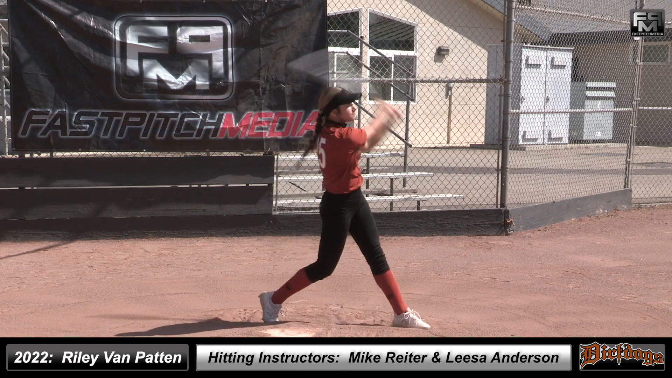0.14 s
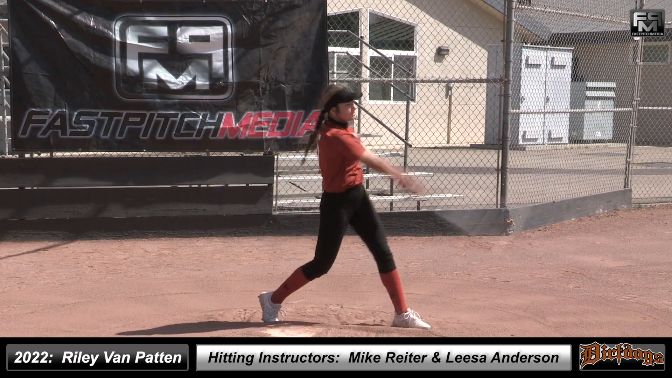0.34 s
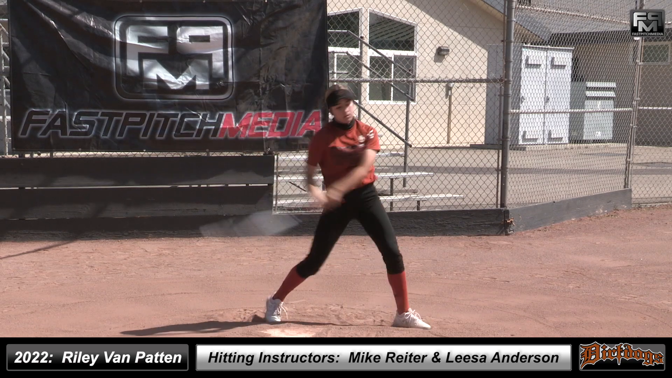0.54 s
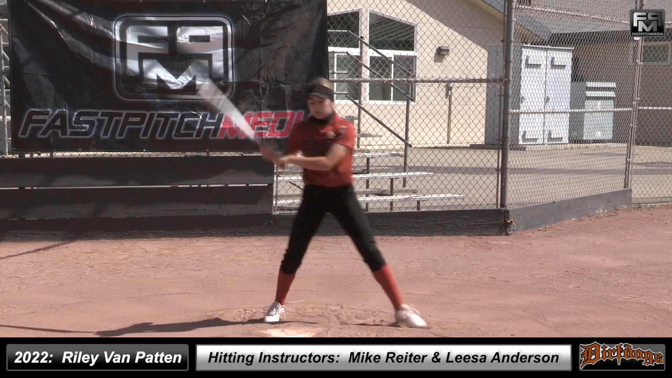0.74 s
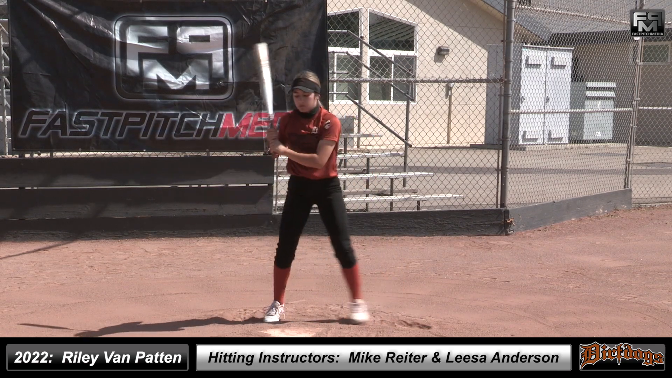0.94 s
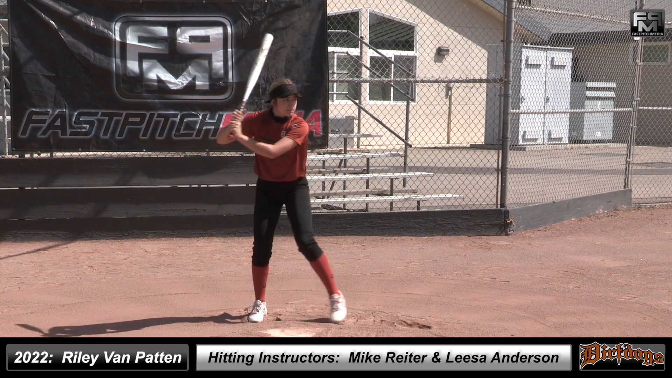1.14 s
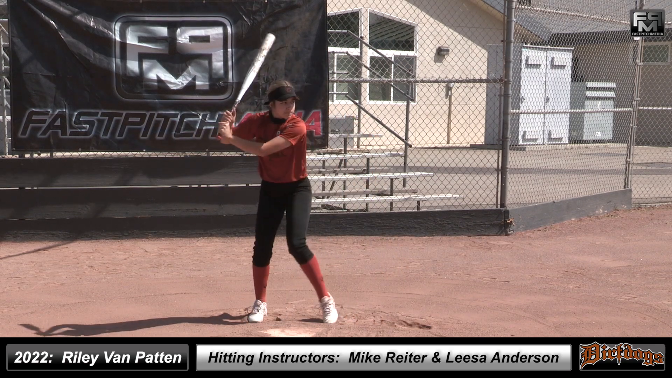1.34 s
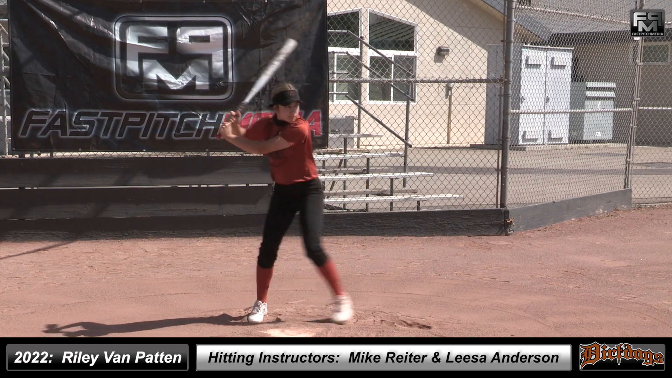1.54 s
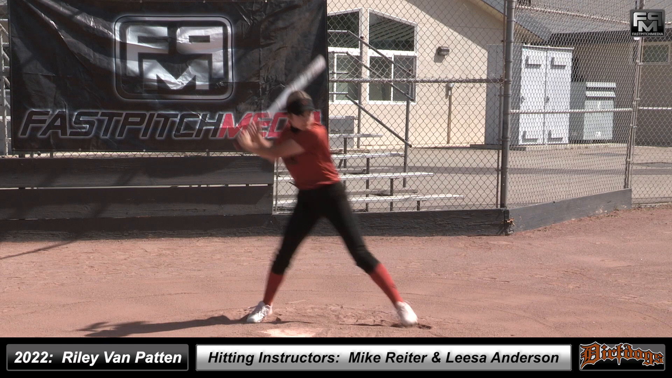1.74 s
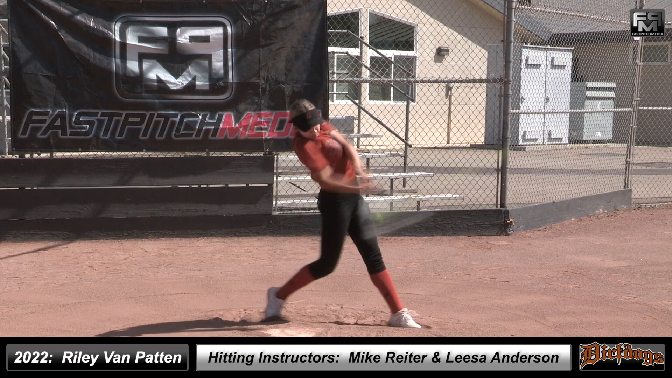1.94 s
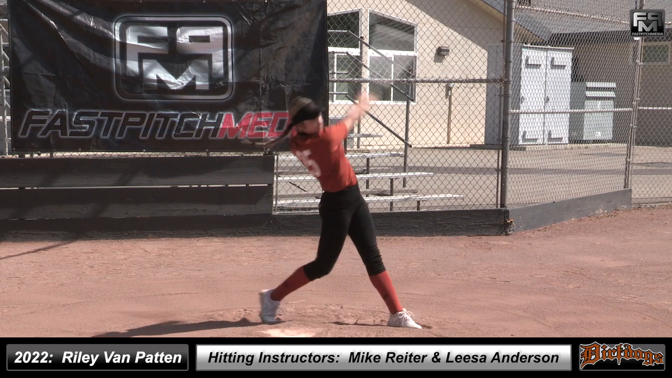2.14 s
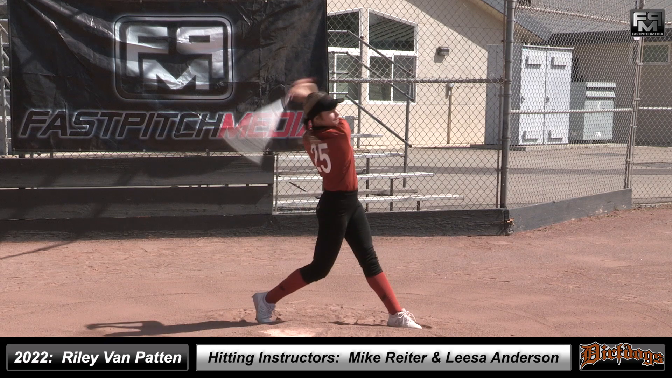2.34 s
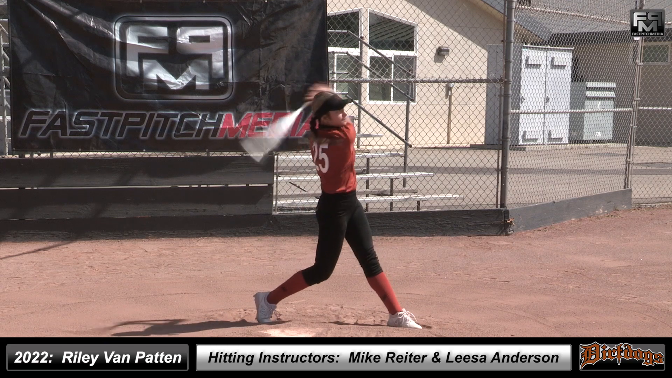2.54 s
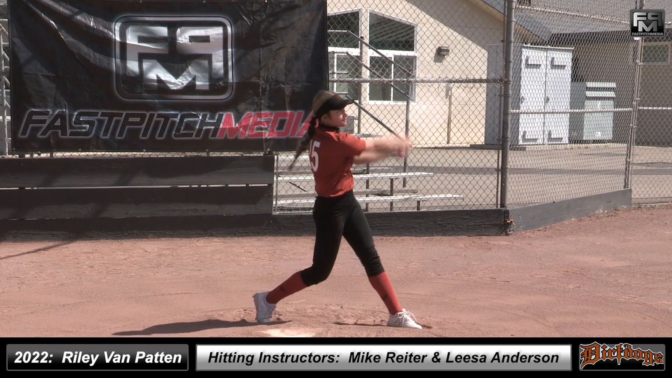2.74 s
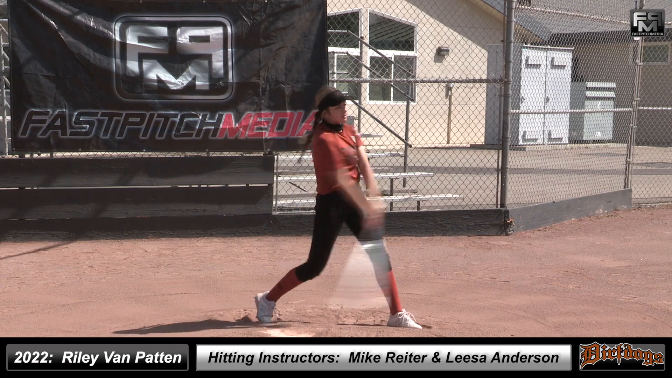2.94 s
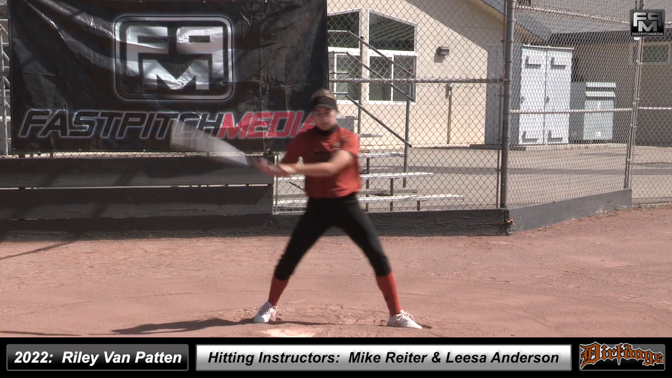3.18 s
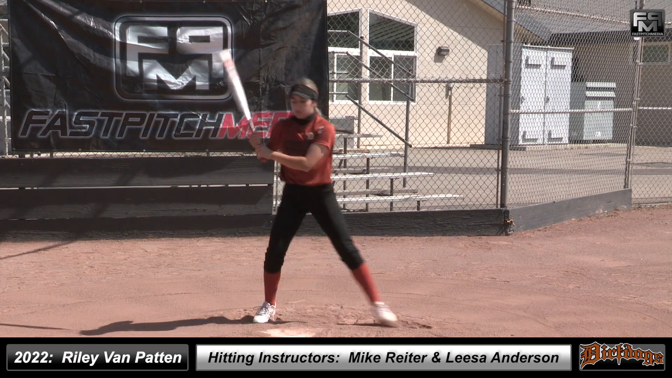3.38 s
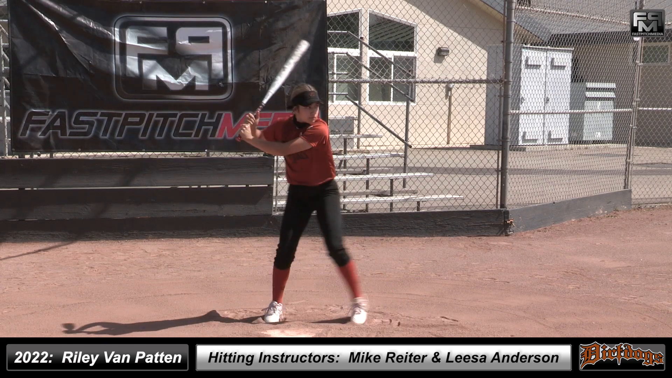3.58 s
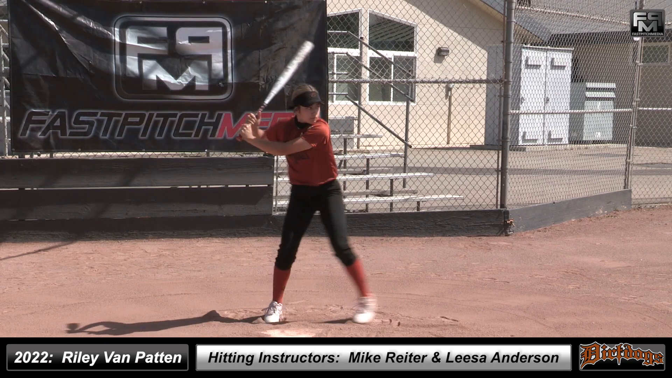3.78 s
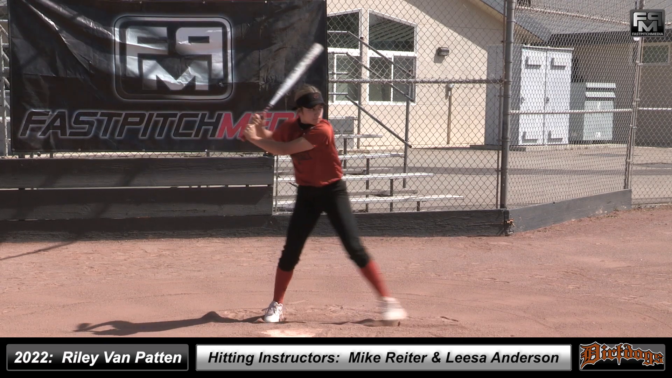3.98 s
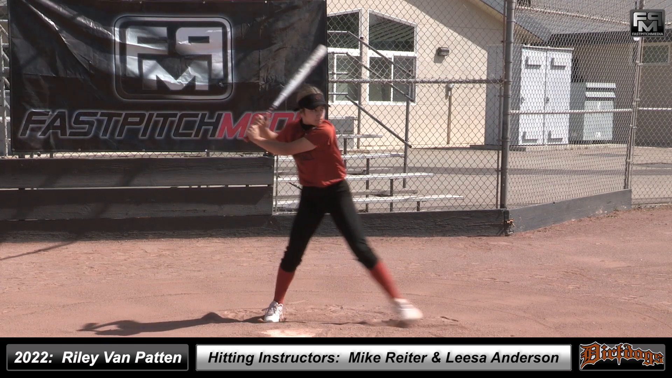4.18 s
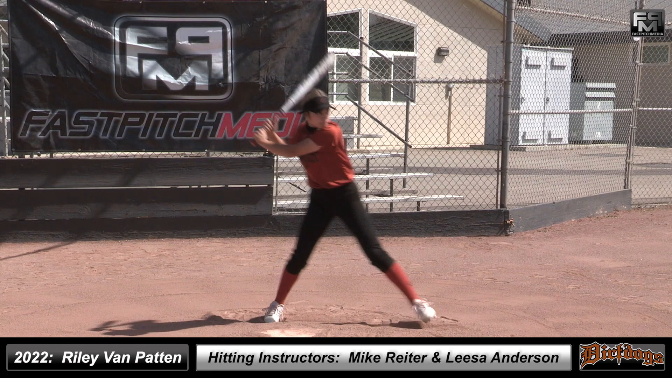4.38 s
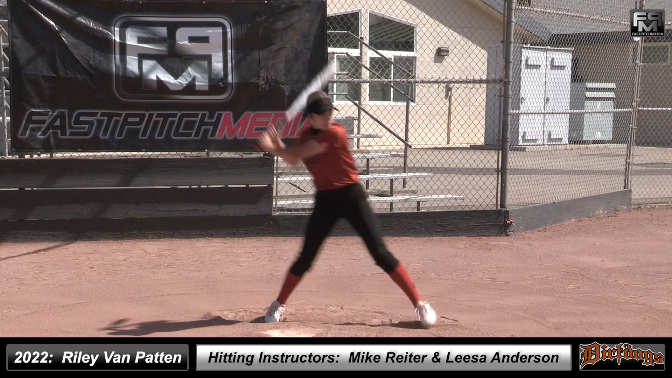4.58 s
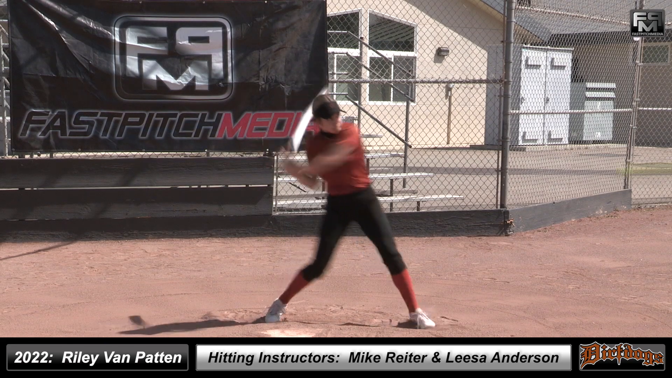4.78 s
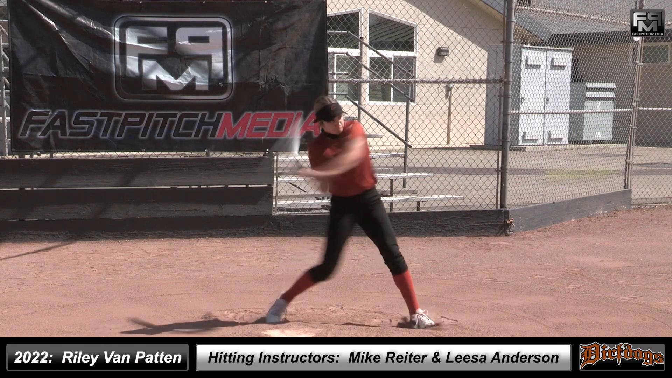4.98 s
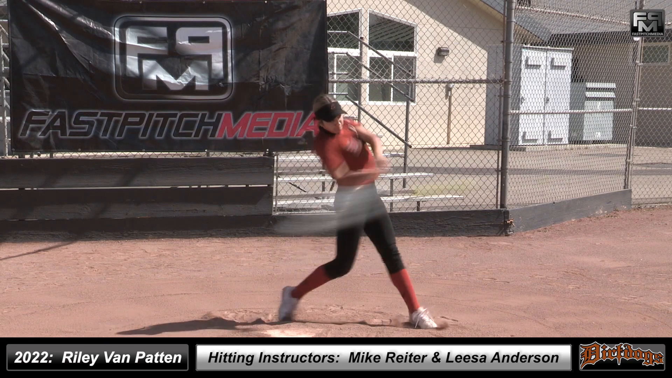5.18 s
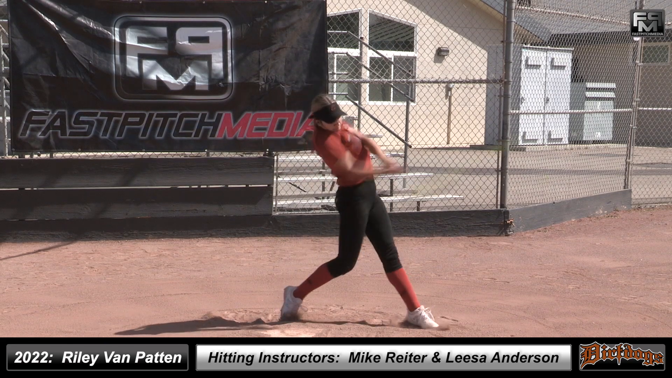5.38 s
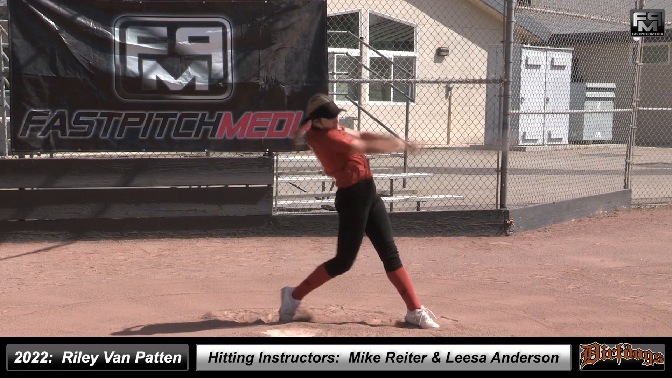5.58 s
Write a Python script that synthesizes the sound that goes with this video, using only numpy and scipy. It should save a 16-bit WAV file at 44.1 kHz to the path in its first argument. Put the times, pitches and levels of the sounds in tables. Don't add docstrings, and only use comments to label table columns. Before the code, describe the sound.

The tail of an earlier hit is dying away at the start, over a low motor hum, rumbling distant traffic and light hiss. Faint ticks and a shoe scuff come before 1 s. At 1.0 s a pitching machine gives a short hollow clack, with a clear slap echo about 0.2 s later. A stride scrapes dirt near 1.9 s, then at 2.0 s the bat cracks violently, clipping the microphone; fences and walls return a burst of clattering echoes and a grainy tail over a second long. A ball smacks at 2.5 s with a low thud, with a weaker thud near 3.1 s. At 3.58 s a momentary silence marks a cut to a duller, closer background. Soft scuffs follow, a brighter close clack at 4.48 s, a tick at 5.2 s and a dull step at 5.3 s. At 5.44 s a full, punchy crack hits and the background abruptly ducks, leaving faint echoes and small ticks.

```python
import sys
import numpy as np
from scipy import signal
from scipy.fft import rfft, irfft
from scipy.io import wavfile
from scipy.ndimage import uniform_filter1d

SR = 44100
rng = np.random.default_rng(int(sys.argv[2]) if len(sys.argv) > 2 else 0)


def magnitude_from_level(level_db):
    exponent = np.asarray(level_db, float) / 20
    return 10 ** exponent


def wrap_up_sound(samples):
    columns = np.atleast_2d(samples).T
    tamed = np.clip(columns, -1, 1)
    steps = np.round(tamed * 32767).astype(np.int16)
    wavfile.write(sys.argv[1], SR, steps)


N = 247842
T = np.arange(N) / SR
SPLICE_S, GAP_S = 3.5825, .0055


def band(x, hz, width):
    edges = [hz * 2 ** (-width / 2), min(hz * 2 ** (width / 2), SR / 2.2)]
    return signal.sosfilt(signal.butter(2, edges, "band", fs=SR, output="sos"), x)


def unit(x):
    return x / np.sqrt(np.mean(x ** 2))


def walk(rate, count):
    hold = max(int(SR / rate), 1)
    levels = np.repeat(rng.standard_normal(count // hold + 2), hold)
    return unit(uniform_filter1d(levels, hold)[hold // 2:hold // 2 + count])


def add(out, sound, s):
    i = int(s * SR)
    sound = sound[max(-i, 0):N - i]
    out[max(i, 0):max(i, 0) + len(sound)] += sound


def coloured(spectrum, count):
    hz = np.maximum(np.fft.rfftfreq(count, 1 / SR), 1)
    at, shape_db = np.transpose(spectrum)
    shape = magnitude_from_level(np.interp(np.log(hz), np.log(at), shape_db, left=-70))
    bins = rfft(rng.standard_normal(count)) * shape
    return bins * count / np.sqrt(2 * np.sum(np.abs(bins) ** 2)), hz


def ring(modes):
    t = T[:1024]
    blow = sum(magnitude_from_level(db - 60 * t / t60) * np.sin(2 * np.pi * hz * t) for hz, db, t60 in modes)
    return signal.sosfilt(signal.butter(3, 650, "high", fs=SR, output="sos"), blow)


def knocks(rows, modes):
    out, blow = np.zeros(N), ring(modes)
    chance = rng.standard_normal((len(rows), 1024))
    for (s, db, hz, full_db, scatter), spread in zip(rows, chance):
        arrivals = spread * np.exp(-(T[:1024] / max(1.84 * scatter, 1e-4)) ** 2)
        arrivals[0] = 2.4
        source = unit(band(blow, hz, 1.0)) + magnitude_from_level(full_db) * unit(blow)
        sound = signal.fftconvolve(source, arrivals)
        add(out, magnitude_from_level(db) * sound / np.abs(sound).max(), s)
    return out


def air(spectrum, db, flicker_db):
    bins, hz = coloured(spectrum, 2 ** 18)
    bass_share = 1 / (1 + (hz / 1500) ** 2)
    steady = irfft(bins * (1 - bass_share))[:N]
    bass = irfft(bins * bass_share)[:N]
    return magnitude_from_level(db) * (steady + bass * magnitude_from_level(flicker_db * walk(2.7, N)))


# f/Hz, far level/dB, near level/dB
MOTOR_LINES = [(110.6, -55.5, -53.5), (148.5, -55.5, -51), (237.6, -57.5, -59.5), (358, -66, -65),
               (475, -65, -63.5), (768, -74.5, -64), (947, -68.5, -74)]


def motor(view):
    out = np.zeros(N)
    turns = np.cumsum(1 + .006 * walk(8, N)) / SR
    sway = magnitude_from_level(2.0 * walk(10.0, N))
    for hz, *levels_db in MOTOR_LINES:
        line_sway = np.roll(sway, int(hz * 100))
        out += np.sqrt(2) * magnitude_from_level(levels_db[view]) * line_sway * np.sin(2 * np.pi * hz * turns)
    return out


# f/Hz, level/dB per Hz
AIR_FAR_SPECTRUM = [(18, -42), (30, -17.5), (81, -0.5), (141, -1), (199, -7.5), (239, -7), (336, -9.5),
                    (937, -16), (1040, -18), (2480, -26), (5740, -40), (14800, -45), (16000, -50)]
# f/Hz, level/dB per Hz
AIR_NEAR_SPECTRUM = [(18, -53), (30, -22.5), (93, -1.5), (141, -3.5), (287, -15), (364, -14), (540, -20.5),
                     (760, -21), (1390, -33), (3400, -41), (5590, -47), (14800, -58.5), (16000, -62.5)]


def background():
    far = air(AIR_FAR_SPECTRUM, -43, flicker_db=.3) + motor(0)
    near = air(AIR_NEAR_SPECTRUM, -44.5, flicker_db=.25) + motor(1)
    duck_s, duck_db, fall_s = 5.437, -18, 0.009
    duck = magnitude_from_level(duck_db * (1 - np.exp(-np.maximum(T - duck_s, 0) / fall_s)))
    return np.where(T < SPLICE_S, far, duck * near)


# f/Hz, level/dB per Hz
BAT_COLOUR = [(120, -62), (200, -28), (353, -9.5), (777, -12.5), (916, -7), (1680, -5), (2050, -10),
              (3900, -12), (5940, -21.5), (10700, -30.5), (16000, -50)]
# f/Hz, level/dB per Hz
CHUTE_COLOUR = [(200, -43.5), (1200, -15.5), (2200, -12), (3000, -2.5), (3900, -10.5), (5000, -11.5),
                (6200, -18), (16000, -35)]
# f/Hz, level/dB per Hz
NEAR_COLOUR = [(200, -38), (600, -23), (860, 2.5), (1150, -5), (1450, -1), (2400, -12), (3800, -9),
               (4500, -18.5), (8400, -28), (12000, -30.5), (16000, -38.5)]
# f/Hz, t60/s
FIELD_DECAY = [(300, 1.28), (1000, 1.19), (2000, 1.32), (4000, 1.03), (8000, 0.7), (14000, 0.35)]
# t/s, start level/dB, colour, t60 scale, extra gain-control fade/dB per s
DIFFUSE_TAILS = [
    (-.3, -27, "bat", 0.95, 4.5),
    (1.012, -44, "chute", 1.1, -15.5),
    (1.999, -18.5, "bat", 1.016, 1.5),
    (2.495, -50, "bat", 1.16, -14),
    (3.06, -48.5, "near", 0.38, 0),
    (4.485, -51, "chute", 0.55, 3),
    (5.437, -16.5, "near", 1.7, 602),
    (5.45, -54.5, "bat", 1.5, 3),
]


def tails():
    out, count = np.zeros(N), 2 ** 15
    colours = {"bat": BAT_COLOUR, "chute": CHUTE_COLOUR, "near": NEAR_COLOUR}
    hz_at, t60_at = np.transpose(FIELD_DECAY)
    for s, db, colour, scale, duck_db in DIFFUSE_TAILS:
        bins, hz = coloured(colours[colour], count)
        crackle = np.clip(walk(500, count), 0, 2.2) ** 2
        patch_db = 1.3 * walk(90, count) + 1.2 * crackle - 1.0
        for centre in 250 * 2. ** np.arange(7):
            octave = irfft(bins * np.clip(1 - np.abs(np.log2(hz / centre)), 0, 1), count)
            t60 = scale * np.interp(np.log(centre), np.log(hz_at), t60_at)
            fade_db = (60 / t60 + duck_db) * T[:count]
            add(out, octave * magnitude_from_level(db - fade_db + patch_db + 1.5 * walk(70, count)), s)
    return out


# t/s, peak level/dB, f/Hz, full-band share level/dB
BALL_TICKS = [(.158, -40.5, 2200, -9), (.178, -40, 3800, -4), (.7345, -31, 3600, 3),
              (1.3914, -41, 8000, 2.5), (1.8865, -33, 4030, 8), (1.955, -35, 1920, -8),
              (2.4929, -20, 4300, -3), (2.4935, -25, 1700, -8), (2.4962, -27, 3600, 3),
              (2.522, -36, 5000, 3), (3.0585, -41, 3200, -6), (3.079, -36, 1500, -6),
              (3.083, -39, 950, -12), (3.112, -40, 1970, -4), (3.207, -44, 2400, -8),
              (4.597, -53, 8960, -1), (5.2118, -33, 2200, 3), (5.222, -50, 6000, 6),
              (5.285, -44, 4230, 1.5), (5.3044, -25, 2300, 5), (5.5165, -44, 6500, -5),
              (5.5735, -37.5, 4500, -1)]


def ticks():
    cycles = 2.6
    rows = [(s, db, hz, full_db, cycles / hz) for s, db, hz, full_db in BALL_TICKS]
    return knocks(rows, BAT_MODES[2:])


# middle t/s, level/dB, rise/s, fall/s, treble level/dB
SCUFF_SWELLS = [
    (.735, -55, 0.021, 0.024, -16),
    (1.87, -51, 0.018, 0.056, -19),
    (1.991, -45.5, 0.025, 0.0049, -18),
    (3.39, -66, .03, 0.026, -7),
    (3.925, -64, 0.02, 0.015, -20),
    (4.8, -59, 0.062, 0.075, -19),
    (4.95, -65.5, 0.018, 0.016, -3),
    (5.302, -43, 0.014, 0.019, -31),
    (5.432, -52, 0.05, 0.004, -18),
]


def scuffs():
    grit = rng.standard_normal(N) * magnitude_from_level(2.9 * walk(700, N))
    low, high = unit(band(grit, 2000, 2.07)), unit(band(grit, 9000, 1.1))
    out = np.zeros(N)
    for s, db, rise, fall, treble_db in SCUFF_SWELLS:
        i = slice(int((s - 4 * rise) * SR), int((s + 4 * fall) * SR))
        swell = np.exp(-.5 * ((T[i] - s) / np.where(T[i] < s, rise, fall)) ** 2)
        out[i] += magnitude_from_level(db) * swell * (low[i] + magnitude_from_level(treble_db) * high[i])
    return out


# t/s, peak level/dB, f/Hz, t60/s
DULL_THUMPS = [(1.011, -30, 280, .019), (1.188, -36, 700, .015), (1.957, -38, 450, .02),
               (1.9978, -8, 700, .015), (2.4955, -24, 135, .06), (2.5235, -30, 132, .08),
               (3.08, -38, 240, .048), (4.486, -25.5, 620, .048), (4.4915, -31.5, 560, .046),
               (4.499, -26, 377, .018), (5.306, -38, 520, .03), (5.437, -29, 230, .03),
               (5.4385, -12.5, 855, .06)]


def thumps():
    out, t = np.zeros(N), T[:8192]
    for s, db, hz, t60 in DULL_THUMPS:
        add(out, -magnitude_from_level(db - 60 * t / t60) * np.sin(2 * np.pi * hz * t), s)
    return out


# t/s, peak level/dB, f/Hz, full-band share level/dB, scatter/s
DIRECT_BLOWS = [
    (1.0113, -22, 3930, -6, .0011),
    (1.9976, 15, 2534, -4, 0.0052),
    (4.4837, -14, 3600, 7, 0.00135),
    (5.4365, 6.5, 1427, -3, .0001),
]
# first loss level/dB, fade/dB per trip, net f/Hz, fence f/Hz
CAGE_FLUTTER = [
    (-3, 2, 3300, 3100),
    (-2, 3, 1550, 2300),
    (-12, 0.5, 2500, 3600),
    (-20, 11.5, 1530, 2800),
]
TRIP_MS = [15.2, 6.4, 7.1, 8.7]
TRIPS = [4, 6, 2, 3]


def echoes(which, walls, is_clack, full_db):
    s, db, *_ = DIRECT_BLOWS[which]
    loss_db, fade_db, *sides_hz = CAGE_FLUTTER[which]
    rows = [DIRECT_BLOWS[which]]
    for k in range(TRIPS[which]):
        hz = sides_hz[k % 2]
        at_s = s + (k + 1) * TRIP_MS[which] / 1000
        rows.append((at_s, db + loss_db - k * fade_db, hz, -1.5, 6.5 / hz))
    for delay, hz, *echo_db in walls:
        if echo_db[is_clack] is None:
            continue
        share_db, cycles = full_db, 4.5
        if delay > 0.19:
            share_db, cycles = (full_db, 1) if is_clack else (-8, 3.8)
        if is_clack:
            hz = 3080
        rows.append((s + delay, echo_db[is_clack], hz, share_db, cycles / hz))
    return rows


# f/Hz, level/dB, t60/s
FAR_CHUTE_MODES = [(1595, 6.5, 0.0067), (2400, 0.5, 0.0023), (2940, 3.5, 0.0034), (3940, -8, 0.0065),
                   (5000, 2.5, 0.0036), (6500, -5, 0.0034), (9500, -15, 0.00091)]
# f/Hz, level/dB, t60/s
NEAR_CHUTE_MODES = [(1370, -0.5, .008), (2385, 1.5, 0.0075), (3590, 1.5, 0.0072), (4360, -8, 0.0055),
                    (5240, 0.5, 0.006), (6650, -8.5, .007), (9050, -19, 0.0024), (12500, -30, .0012)]
# delay t/s, f/Hz, crack level/dB, clack level/dB (None = shadow)
FAR_REFLECTORS = [(.0085, 3000, None, -29), (.034, 3000, None, -28), (.053, 2000, -14.5, None),
                  (.065, 2500, -17.5, None), (.0715, 3000, None, -25), (.0762, 1784, -5, -32),
                  (.0957, 1410, -15.5, None), (.104, 3600, -7.5, -36), (.138, 3000, -22, -42),
                  (.155, 2920, None, -35), (.1754, 4430, -10.5, -17.5), (.185, 2970, -14, -27.5),
                  (.2192, 3260, -14, None), (.226, 3000, None, -30), (.2447, 4000, -22, None),
                  (.2607, 3530, -26, None), (.2697, 4000, -22, None), (.300, 4000, -35, None),
                  (.342, 3380, -25, None)]
# delay t/s, f/Hz, crack level/dB, clack level/dB (None = shadow)
NEAR_REFLECTORS = [(.0255, 7000, None, -48), (.0318, 3200, -34, None), (.047, 2400, -42, None),
                   (.0735, 1010, -39.5, -48), (0.0794, 1030, -35.5, None), (.1125, 4500, -63, None),
                   (.1375, 1490, -40, None), (.1685, 980, -45.5, None)]


def clacks():
    far = knocks(echoes(0, FAR_REFLECTORS, True, -11.5), FAR_CHUTE_MODES)
    near = knocks(echoes(2, NEAR_REFLECTORS, True, -11.5), NEAR_CHUTE_MODES)
    return far + near


# f/Hz, level/dB, t60/s
BAT_MODES = [(839, -16.5, 0.029), (1282, -10, 0.0097), (1582, 2.5, 0.006), (2194, -0.5, 0.0043),
             (2830, -1.5, 0.0037), (3600, -5, 0.0044), (4760, -7.5, 0.0031), (7000, -13, 0.0032),
             (10200, -15, 0.0011)]
# delay t/s, peak level/dB, f/Hz
GROUND_BOUNCES = [
    (.0017, -1.5, 3034),
    (.0036, -3.5, 1120),
    (.0175, -24, 1100),
]


def cracks():
    near_s = DIRECT_BLOWS[3][0]
    ground = [(near_s + delay, db, hz, -15.5, 1.52 / hz) for delay, db, hz in GROUND_BOUNCES]
    far = echoes(1, FAR_REFLECTORS, False, -2.5)
    near = echoes(3, NEAR_REFLECTORS, False, -9)
    return knocks(far + near + ground, BAT_MODES)


def scene():
    blows = ticks() + clacks() + cracks()
    return (background() + tails() + scuffs() + thumps() + blows)[None]


def band_limit(x):
    return signal.sosfilt(signal.butter(12, 16340, fs=SR, output="sos"), x)


def record(dry):
    far = T < SPLICE_S
    far_top, near_top = 0.25, 1.0
    top = np.where(far, far_top, 2 * near_top)
    clipped = np.clip(dry, -top, top)
    bias = uniform_filter1d(uniform_filter1d(far * (clipped / top) ** 2, size=600), size=600)
    drift = signal.sosfilt(signal.butter(2, 2.0, "high", fs=SR, output="sos"), 0.046 * bias)
    gate = np.clip((np.abs(T - SPLICE_S - GAP_S / 2) - GAP_S / 2) * SR / 8, 0, 1)
    lowpass = signal.ellip(6, .2, 60, 15900, fs=SR, output="sos")
    mix = signal.sosfiltfilt(lowpass, (clipped + drift) * gate)
    return band_limit(np.clip(mix, -near_top, near_top))


dry = scene()
out = record(dry)
wrap_up_sound(out)
```